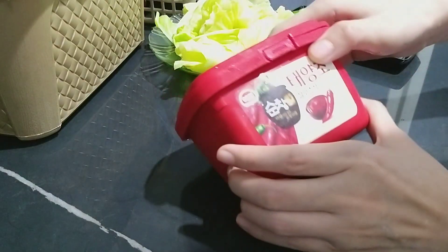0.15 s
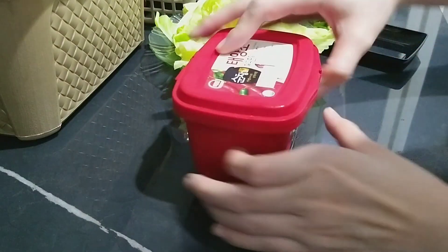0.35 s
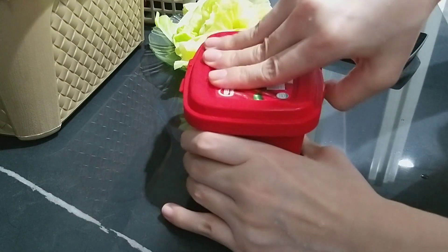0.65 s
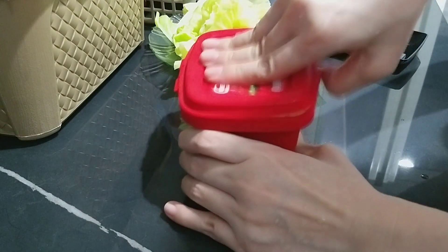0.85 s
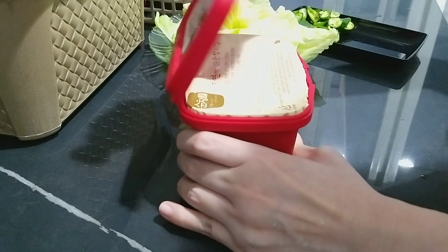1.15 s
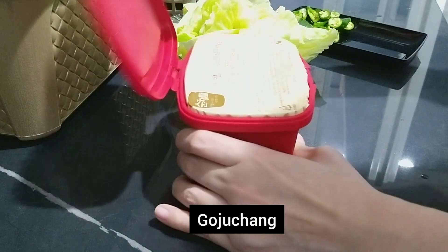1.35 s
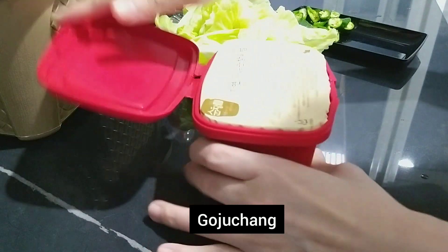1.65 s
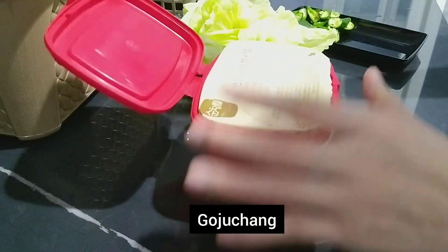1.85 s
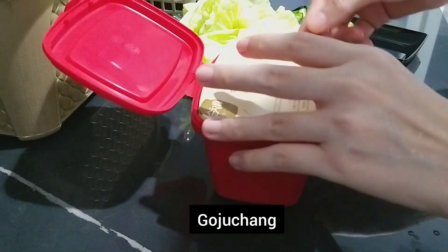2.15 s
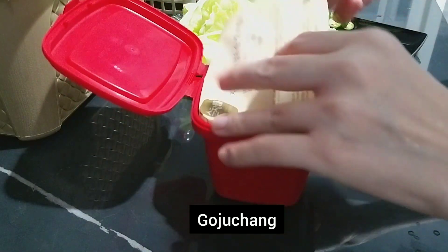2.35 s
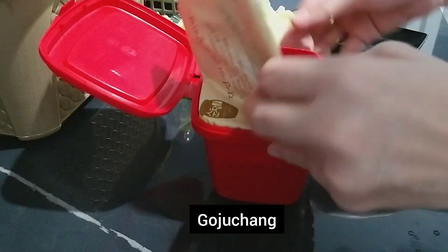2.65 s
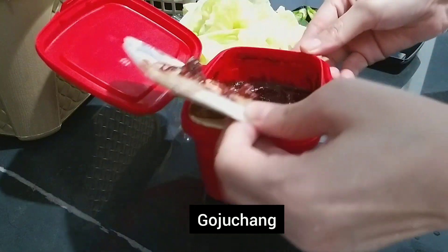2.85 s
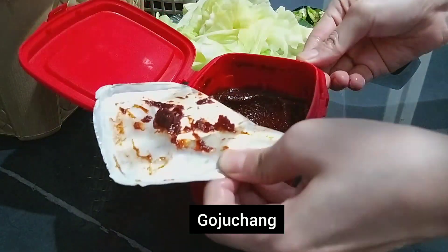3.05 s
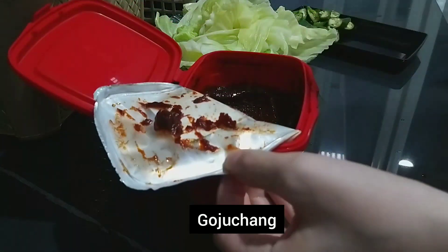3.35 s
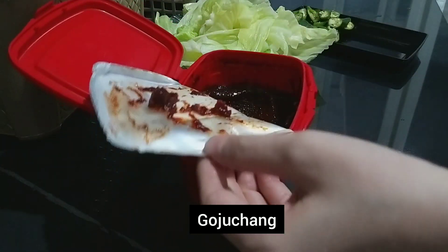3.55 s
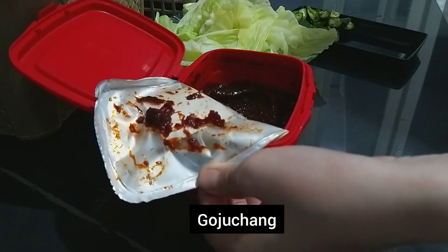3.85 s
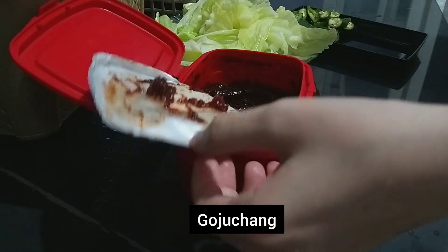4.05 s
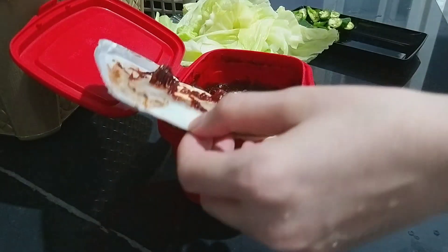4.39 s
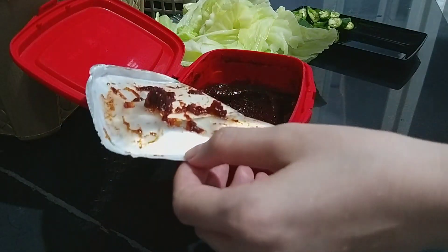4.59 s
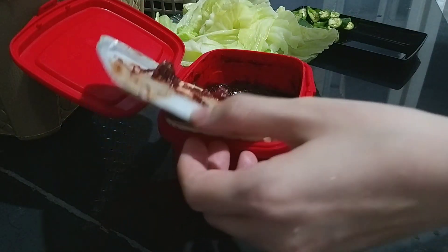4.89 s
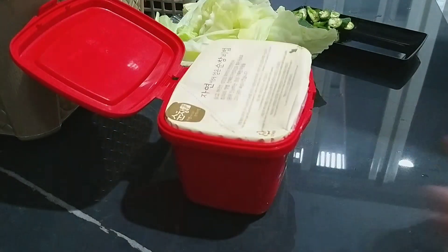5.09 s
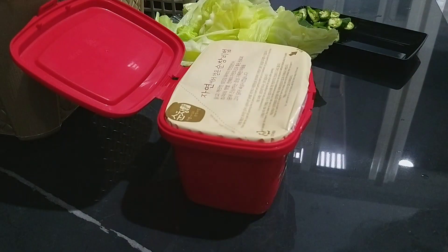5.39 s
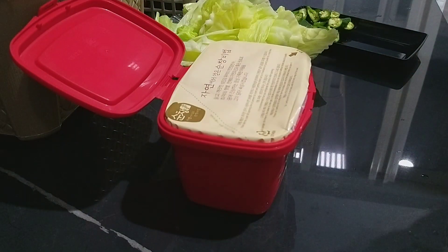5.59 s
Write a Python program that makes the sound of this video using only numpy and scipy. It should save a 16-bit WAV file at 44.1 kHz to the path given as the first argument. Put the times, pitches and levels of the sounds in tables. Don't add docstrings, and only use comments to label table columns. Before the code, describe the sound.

Close stereo in a hard, echoing kitchen with low building hum. A full plastic tub knocks onto stone, its lid clips crack open loudly and the lid flaps back. Nails tick at a film seal, which crinkles and tears in jumps. Then something drags at the right, crashes, and dishes rattle, skid and tumble until the end.

```python
import sys
import numpy as np
from scipy import signal
from scipy.fft import rfft, irfft, next_fast_len
from scipy.io import wavfile
from scipy.ndimage import map_coordinates

SR = 44100
rng = np.random.default_rng(int(sys.argv[2]) if len(sys.argv) > 2 else 0)


def transcribe(signal):
    frames = np.atleast_2d(signal).T
    limited = np.clip(frames, -1, 1)
    pcm = np.round(limited * 32767).astype(np.int16)
    wavfile.write(sys.argv[1], SR, pcm)


def elevation(decibels):
    levels = np.asarray(decibels, float)
    return 10 ** (levels / 20)


N = 252584
LIFE = 4096
ROOMS = 4
FILM_PAN_DB, FAR_PAN_DB = 2.8, -2.5

# (frequency [Hz], level [dB], t60 [s])
FAR_BODY = [(165, -12.5, 0.05), (234, -2.5, 0.097), (260.4, 4, 0.053), (462, 2, 0.1), (533, 13.5, 0.052),
            (568, 4.5, 0.044), (777, -1.5, 0.068), (1140, -7, 0.053), (1270, -3, 0.05)]
# (frequency [Hz], sharpness Q [1], level [dB])
FLAT_RING = [(1000, 14, -2.5), (1290, 36, -2), (1586, 58, 2), (1770, 56, 12), (1850, 63, 12.5),
             (2376, 56, 9.5), (2750, 53, 1), (3270, 21, 6), (3680, 40, -1), (3880, 37, 2), (4170, 53, 3.5),
             (4960, 56, -5), (5830, 89, -4), (6750, 74, 2)]
# (frequency [Hz], sharpness Q [1], level [dB])
RIM_RING = [(760, 30, 2), (1140, 29, 2.4), (1276, 13, 3.4), (1727, 73, 7), (2540, 30, 6.8),
            (3070, 150, 2.7), (3743, 55, 8.9), (4060, 67, 3.6), (4470, 46, 3), (4930, 80.4, 7.7),
            (5790, 100, 3.5)]


def unit(x):
    return x / np.sqrt(np.mean(x ** 2) + 1e-20)


def along(points, hz, axis=1):
    p = np.transpose(points)
    return np.interp(np.log(hz + 1), np.log(p[0] + 1), p[axis])


def wobble(rate):
    knots = rng.standard_normal(int(N * rate / SR) + 4)
    return map_coordinates(knots, [np.arange(N) * rate / SR])


def filtered(x, response):
    n = x.shape[-1]
    m = next_fast_len(n + LIFE)
    return irfft(rfft(x, m) * response(np.fft.rfftfreq(m, 1 / SR)), m)[..., :n]


def diffuse(pair, gain):
    # (frequency [Hz], correlation [1])
    likeness = [(60, 0.92), (130, 0.87), (290, 0.75), (640, 0.34), (1410, -0.22), (3100, 0.037),
                (6820, 0.02), (15000, -0.12)]
    turn = lambda hz: np.arccos(np.clip(along(likeness, hz), -1, 1)) / 2
    mid, side = filtered(pair, lambda hz: gain(hz) * np.array([np.cos(turn(hz)), np.sin(turn(hz))]))
    return np.array([mid + side, mid - side])


def resonance(hz, centre_hz, q):
    width = 1j * hz * centre_hz / q
    return width / (centre_hz ** 2 - hz ** 2 + width)


def ringing(modes, flat):
    return lambda hz: flat + sum(elevation(db) * resonance(hz, centre_hz, q) for centre_hz, q, db in modes)


def strokes(rows, rise_db_s, fall_db_s):
    s, hold, *cols = np.transpose(rows)[..., None]
    t = np.arange(N) / SR
    before, after = np.maximum(s - t, 0), np.maximum(t - s - hold, 0)
    shape = elevation(-rise_db_s * before - fall_db_s * after)
    return [(elevation(db) * shape).sum(0) for db in cols]


def contact(row, ring_ms, grows, body, soft_ms, rise_ms, spike, q, alike, trims_db, detune=0.067):
    _, db, knock_db, crack_db, snap_hz = row
    t60_ms = ring_ms * elevation(grows * (db + 33.0))
    t = np.arange(LIFE) / SR
    ms = t * 1000

    shared, own = rng.standard_normal((2, LIFE)), rng.standard_normal((2, 2, LIFE))
    noise = np.sqrt(np.clip(alike, 0, 1)) * shared[:, None] + np.sqrt(np.clip(1 - alike, 0, 1)) * own
    noise = noise * np.repeat(elevation(rng.normal(0, 4, LIFE // 32)), 32)

    def burst(pair, decay_ms):
        fade = elevation(-60 * ms / max(decay_ms, 1)) * (1 - np.exp(-ms / rise_ms))
        fade = fade * (1 + spike * np.exp(-t / 0.0004))
        return np.vstack([pair * fade, np.linalg.norm(fade) * (t == 0)])

    def snap_tone(hz):
        skirt = resonance(hz, snap_hz, .3) / (1 + 1j * hz / (2.5 * snap_hz + 1500)) ** 2
        return resonance(hz, snap_hz, q) * skirt / (1 + 0.18 * snap_hz / (1j * hz + 1))

    snap = filtered(burst(noise[0], t60_ms), snap_tone)
    crack = filtered(burst(noise[1], 0.8 * t60_ms), lambda hz: resonance(hz, 7800, 0.85) ** 2)
    knock = np.zeros(LIFE)
    for hz, level, t60 in body:
        decay = elevation(level + rng.normal(0, 5.2) - 60 * t / t60)
        knock += decay * np.sin(2 * np.pi * hz * rng.normal(1, detune) * t)
    knock = np.tile(knock * (1 - np.exp(-ms / soft_ms)), (3, 1))

    parts = zip((snap, knock, crack), (0, knock_db, crack_db), trims_db)
    return sum(elevation(db + rel + trim) * p / np.abs(p[:2]).max() for p, rel, trim in parts)


def contacts(table, order, pan_db, ring=None, **how):
    out = np.zeros((ROOMS, 3, N + LIFE + 64))
    pan = elevation(np.array([[pan_db], [-pan_db], [0]]) / 2)
    lags = max(order, 0), max(-order, 0), 0
    for k, row in enumerate(table):
        sound = contact(row, **how) * pan
        sound = filtered(sound, ring) if ring else sound
        for c, lag in enumerate(lags):
            out[k % ROOMS, c, round(row[0] * SR) + lag:][:LIFE] += sound[c]
    return out[..., :N]


def kitchen(x):
    # (frequency [Hz], t60 [s], level [dB])
    decay = [(99, 0.62, -3.5), (295, 0.49, -6), (1000, 0.45, 0), (3000, 0.47, -1.5), (7300, 0.42, 3.5),
             (14000, 0.32, 0.5)]
    hz, t, z = signal.stft(rng.standard_normal((2, SR * 3 // 4)), SR, nperseg=256)
    tail = signal.istft(z * elevation(-60 * t / along(decay, hz)[:, None]), SR, nperseg=256)[1]
    n = tail.shape[1]
    tail = tail * np.clip(np.arange(n) / SR / 0.0021 - .3, 0, 1)
    tail = tail * elevation(2.5 * wobble(120)[:n])
    tail = diffuse(tail / np.linalg.norm(tail[0]), lambda f: elevation(along(decay, f, axis=2)))
    return signal.fftconvolve(x[None], tail, axes=1)[:, :N]


def room_tone():
    # (frequency [Hz], density [dB per Hz])
    spectrum = [(12, -51.5), (20, -28), (48, -15.5), (65, -6.5), (86, -7), (258, -20.5), (492, -31),
                (1050, -45.5), (1140, -41.5), (2180, -47), (2890, -47.5), (7510, -46.5), (15200, -44),
                (16500, -51.5)]
    hum = elevation(1.8 * wobble(8.2)) * rng.standard_normal((2, N))
    hiss = elevation(1.0) * rng.standard_normal((2, N))
    low = lambda hz: 1 / (1 + (hz / 450) ** 4)
    air = filtered(hum, low) + filtered(hiss, lambda hz: 1 - low(hz))
    return elevation(-67.5) * unit(diffuse(air, lambda hz: elevation(along(spectrum, hz))))


def rubbing():
    # (time [s], hold [s], rumble [dB], scrape [dB])
    hand = [(.03, 0.011, -60.5, -91), (.278, 0.017, -66.5, -77), (1.375, 0.044, -77, -80.5),
            (1.61, 0.033, -66, -100), (2.23, 0.013, -66, -63), (2.33, 0.07, -89, -66),
            (2.43, 0.24, -65.5, -70), (2.85, 0.065, -62, -90), (2.96, 0.078, -66, -74),
            (3.11, 0.14, -63, -74), (3.33, 0.096, -74.5, -67.5), (3.5, 0.075, -62.5, -67),
            (3.61, 0.24, -83, -78), (5.15, 0.097, -54.5, -56.5), (5.31, 0.27, -52.5, -52),
            (5.58, 0.18, -50.5, -60)]
    # (time [s], weight [dB], slide [dB])
    drag = [(3.949, -100, -99), (4.02, -62, -69), (4.078, -54, -71), (4.14, -43.5, -61),
            (4.506, -45.5, -61), (4.552, -49, -60), (4.572, -45.5, -51), (4.64, -47.5, -46.5),
            (4.669, -42.5, -38), (4.82, -53.5, -56.5), (4.9, -110, -110)]
    # (time [s], hold [s], level [dB])
    thuds = [
        (.886, 0.01, -39),
        (1.408, 0.053, -60.5),
        (3.6, 0.28, -62),
        (3.83, 0.0081, -59),
        (3.88, 0.053, -69),
        (4, 0.051, -51),
        (4.085, 0.014, -43),
        (5.355, 0.051, -54.5),
        (5.51, 0.06, -42.5),
        (5.65, 0.087, -67),
    ]
    # (frequency [Hz], density [dB per Hz])
    rumble_hz_db = [(76, -13.5), (130, 0), (251, -0.5), (288, -3.5), (330, 0.5), (522, -8.5), (617, -7),
                    (776, -11), (1120, -12.5), (1300, -16), (1590, -17.5), (5000, -40.5), (6500, -54.5),
                    (11000, -120)]
    scrape_hz_db = [(470, -37), (800, -4.5), (978, -11), (1440, -17.5), (1950, -13), (3650, -19.5),
                    (4990, -20), (12500, -28), (16000, -38)]
    # (frequency [Hz], sharpness Q [1], level [dB])
    base_hum = [(216, 11, 0), (334, 14, -3.6), (550, 12, -7), (860, 24, -0.5), (1095, 15, 1)]
    slide_ring = [(1022, 17, 7), (1740, 28, 5), (1990, 44, 8), (2343, 35, 8), (2835, 47, 10), (3310, 50, 4),
                  (3500, 37, 7), (3870, 70, 3), (4220, 70, 3), (5400, 110, -2), (7200, 40, 5)]

    s, *drag_db = np.transpose(drag)
    weight, slide = [elevation(np.interp(np.arange(N) / SR, s, db, left=-150)) for db in drag_db]
    rumble_gain, scrape_gain = np.add(strokes(hand, rise_db_s=487, fall_db_s=345), [weight, slide])
    lumps = elevation(.5 * wobble(30) + 1.2 * wobble(150)) * rng.standard_normal((2, N))
    slips = elevation(1.2 * wobble(60) + 3 * wobble(900)) * rng.standard_normal((2, N))
    base, surface = ringing(base_hum, flat=1.1), ringing(slide_ring, flat=1.3)
    rumble = unit(diffuse(lumps, lambda hz: elevation(along(rumble_hz_db, hz)) * base(hz)))
    scrape = unit(diffuse(slips, lambda hz: elevation(along(scrape_hz_db, hz)) * surface(hz)))

    worktop = lambda hz: resonance(hz, 127, 1.2) ** 2 * np.minimum(hz / 70, 1)
    shudder = unit(diffuse(rng.standard_normal((2, N)), worktop))
    bumps = strokes(thuds, rise_db_s=500, fall_db_s=299.5)[0] + elevation(-14.5) * weight
    return rumble_gain * rumble + scrape_gain * scrape + bumps * shudder


def creaking():
    # (time [s], hold [s], level [dB], pitch [Hz])
    creaks = [
        (0.035, .05, -72.5, 550),
        (0.055, 0.05, -82, 1130),
        (3.491, 0.067, -55.5, 416),
        (3.614, 0.029, -64, 424),
        (4.567, 0.215, -53, 230),
    ]
    pitches_hz = np.array([row[3] for row in creaks])[:, None]
    hums = filtered(rng.standard_normal(N), lambda hz: resonance(hz, pitches_hz, 4.3) ** 2)
    gains = [strokes([row[:3]], rise_db_s=1500, fall_db_s=899.5)[0] for row in creaks]
    return sum(gain * unit(hum) for gain, hum in zip(gains, hums))


def tub_and_clips():
    # (time [s], snap [dB], knock re snap [dB], crack re snap [dB], snap pitch [Hz])
    hits = [(0.2973, -29.5, 16.5, -6.5, 1690), (0.3037, -29, 5, -15.5, 1850), (0.3154, -26, 9, -24.5, 1064),
            (.8535, -46.5, 2, -7.5, 1465), (0.8582, -26, -8.5, -7, 3084), (0.8652, -12.5, 0, -5.5, 3060),
            (.872, -24.5, -2, -3, 2863), (0.8798, -15.5, -11, -1, 3180), (0.8842, -20.5, 6.5, -6, 754),
            (0.8875, -17, 0.5, -7, 894), (1.0948, -49.5, 8, -29.5, 1005)]
    # (frequency [Hz], level [dB], t60 [s])
    closed_body = [(167, -5, 0.068), (246, 5.5, 0.017), (328, -0.5, 0.05), (404, 1, 0.056),
                   (494, -1.5, 0.055), (704, -4, 0.028)]
    open_body = [(121, -23.5, 0.21), (174, -4.5, 0.039), (234, -3, 0.007), (356, 4.5, 0.038),
                 (410, 2.5, 0.033), (487, -11.5, 0.18), (785, -6.5, 0.051)]
    down = contacts(hits[:3], order=-2, pan_db=1.0, body=closed_body, detune=.025, ring_ms=54, grows=0.015,
                    soft_ms=0.96, rise_ms=0.17, spike=1.4, q=0.8, alike=0.15, trims_db=(.1, .1, .1))
    clips = contacts(hits[3:], order=-2, pan_db=1.5, body=open_body[2:], ring_ms=33, grows=-.05,
                     soft_ms=0.46, rise_ms=0.66, spike=0.48, q=1.0, alike=0.14, trims_db=(.1, .1, .1))
    return down + clips


def lid_flop():
    # (time [s], snap [dB], knock re snap [dB], crack re snap [dB], snap pitch [Hz])
    flops = [
        (1.4087, -49.5, 2.1, -7, 930),
        (1.4277, -45.5, 1.1, 1, 1000),
        (1.4517, -57.5, 7.7, -11.5, 962),
        (1.6487, -43, 11, -26, 1560),
        (1.6722, -35.5, 10.1, -15, 1210),
        (1.7207, -35, 10.1, -13.5, 1430),
    ]
    # (frequency [Hz], level [dB], t60 [s])
    hinge_body = [(123, 7.5, 0.065), (160, 5.5, 0.076), (218, 3, 0.041), (274, 0.5, 0.077),
                  (368, 2.5, 0.048), (581, -11.5, 0.068), (950, -9.5, 0.029)]
    lid_body = [(158.5, -9, 0.038), (219.6, -12, 0.038), (230, 11.5, 0.042), (364, 12, 0.036),
                (418.5, 3, 0.049), (446, -3.5, 0.063), (560, -7.5, 0.087)]
    swing = contacts(flops[:3], order=-5, pan_db=2.5, body=hinge_body, ring_ms=100, grows=0.01,
                     soft_ms=4.3, rise_ms=0.72, spike=1.45, q=0.07, alike=0.051, trims_db=(-3, 4, -3))
    landing = contacts(flops[3:], order=-5, pan_db=2.5, body=lid_body, detune=0.034, ring_ms=113, grows=0.0089,
                       soft_ms=2.5, rise_ms=0.28, spike=2.3, q=0.36, alike=0.11, trims_db=(-3, .1, -3))
    return swing + landing


def crinkling():
    # (time [s], hold [s], level [dB])
    folds = [
        (2.175, 0.15, -66),
        (2.33, 0.085, -52),
        (2.46, 0.39, -71),
        (2.86, 0.055, -52.5),
        (3.44, 0.079, -58),
        (3.645, 0.026, -50.5),
    ]
    sizes = elevation(3 * np.minimum(rng.exponential(1, (5, N)), 3.5))
    ticks = (rng.random((5, N)) < 45 / SR) * sizes * rng.choice([-1, 1], (5, N))
    pitches_hz = np.array([[500], [640], [780], [950], [1300]])
    x = filtered(ticks, lambda hz: resonance(hz, pitches_hz, 5.6) * resonance(hz, pitches_hz, 2.1))
    return elevation(-8.5) * strokes(folds, rise_db_s=269, fall_db_s=254)[0] * unit(x.sum(0))


def film_peel():
    # (time [s], snap [dB], knock re snap [dB], crack re snap [dB], snap pitch [Hz])
    picks = [(2.188, -45.5, 2, -18.5, 2100), (2.2244, -42, -10, -38, 910), (2.2345, -28, -3.5, -27, 2420),
             (2.265, -54, -2, -21, 1000), (2.271, -42, 8.5, -21, 1490), (2.2895, -24, -9, -29, 4000),
             (2.3044, -49, -22, -9, 4170), (2.3106, -32.5, -16, -2.5, 3390), (2.3264, -32, -16, -3, 2820),
             (2.3366, -30, -37, -29, 1280), (2.4214, -49, -11, 11, 960), (2.4937, -51.5, 8, -9, 970),
             (2.5077, -30.5, -12.5, -19, 1320), (2.5391, -52, 4, -25, 969), (2.5684, -57.5, -10, 9, 1130),
             (2.603, -50.5, 19, -23, 970), (2.6214, -39.5, -6, -15, 1560), (2.724, -51, -26, 7, 2000),
             (2.7521, -45.5, -16, -27, 1010), (2.768, -53, 0, -25, 1500)]
    tears = [(2.811, -24.5, -23, -15, 2540), (2.813, -30, -5, 0, 1470), (2.817, -21.5, -9.5, -1.5, 2720),
             (2.8302, -19, -18, -1, 3830), (2.879, -30.5, -32, -31, 2900), (2.8924, -53.5, 17.5, -15, 939),
             (2.9944, -28, -27, -25, 1430), (3.0133, -39, -16, -2, 2070), (3.021, -32, -16.5, 6, 3700),
             (3.086, -33.5, -29, -27, 1460), (3.111, -18.5, -30, -9, 3770), (3.119, -23, -34, -15, 2130),
             (3.3152, -21.5, -33, -42, 4750), (3.344, -38, -37, -30, 1170), (3.419, -20.5, -23, 1.1, 2740),
             (3.449, -41.5, -21, -30, 1140), (3.4868, -40, -3, -23, 1070), (3.5543, -35.5, -24, -30, 1140),
             (3.603, -43, -12, -13, 950), (3.6292, -24.5, -31.5, -20, 1990),
             (3.6476, -28.5, -15.5, -16.5, 1316), (3.7432, -39, -35, -43, 1300),
             (3.785, -18, -40, -43, 3300), (4.045, -48, -22, -14, 4600)]
    # (frequency [Hz], level [dB], t60 [s])
    film_body = [(215, -11.5, 0.029), (422, -8.5, 0.033), (508, -6.5, 0.03), (652, -7, 0.036),
                 (758, -1, 0.016)]
    return contacts([*picks, *tears], order=-6, pan_db=FILM_PAN_DB, body=film_body, ring_ms=34.3, grows=0.09,
                    soft_ms=0.93, rise_ms=.15, spike=3.4, q=0.79, alike=0.077, trims_db=(.1, -3, .1))


def fizzing():
    # (time [s], hold [s], level [dB])
    threads = [(2.19, 0.028, -77), (2.25, 0.026, -79), (2.3, .07, -73), (2.44, 0.079, -81),
               (2.63, 0.12, -75), (2.84, 0.057, -69), (3.03, 0.041, -72), (3.13, 0.072, -63),
               (3.33, 0.018, -54), (3.43, 0.066, -61), (3.65, 0.12, -76), (3.8, 0.13, -70)]
    sizes = elevation(5 * np.minimum(rng.exponential(1, (3, 2, N)), 3.5))
    ticks = (rng.random((3, 2, N)) < 220 / SR) * sizes
    pitches_hz = np.array([2400, 3200, 4700])[:, None, None]
    x = filtered(ticks, lambda hz: resonance(hz, pitches_hz, 5.4) * resonance(hz, pitches_hz, 0.77))
    pan = elevation(np.array([[FILM_PAN_DB], [-FILM_PAN_DB]]) / 2)
    return strokes(threads, rise_db_s=900, fall_db_s=223)[0] * unit(x.sum(0)) * pan


def first_crash():
    # (time [s], snap [dB], knock re snap [dB], crack re snap [dB], snap pitch [Hz])
    hits = [(4.819, -34, 4.5, -4, 2000), (4.825, -25.5, 2, -12, 2500), (4.8318, -11, -25, -3.5, 1030),
            (4.8359, -12, -11.5, -2.5, 2950), (4.844, -8, -12, -4.5, 2330), (4.8512, -10.5, -7, -9.5, 1000),
            (4.8584, -16.5, -7.5, -3, 3030), (4.8702, -25, -3, -19.5, 1800), (4.8815, -17, -7, -15, 1810),
            (4.9529, -36, -31, -24, 1980), (5.2004, -38, -3.5, -1.5, 902)]
    # (frequency [Hz], level [dB], t60 [s])
    crash_body = [(254, -1, 0.06), (291, 8.5, 0.067), (324.6, 5.5, 0.07), (382.6, 1, 0.16),
                  (486.5, 10.5, 0.059), (592, 6.5, 0.091), (703, 2.5, 0.08), (860, 1, 0.074),
                  (1000, 4, 0.054)]
    return contacts(hits, order=13, pan_db=FAR_PAN_DB, ring=ringing(FLAT_RING, flat=1.03), body=crash_body,
                    detune=0.023, ring_ms=33, grows=.01, soft_ms=2.4, rise_ms=1.33, spike=3.7, q=0.07,
                    alike=0.34, trims_db=(-2.5, -1.5, -3.5))


def settling():
    # (time [s], snap [dB], knock re snap [dB], crack re snap [dB], snap pitch [Hz])
    ticks = [(4.8635, -21, -8.5, -8, 2460), (4.8855, -31, 1, -10, 1770), (4.909, -43.5, -15, -9.5, 1800),
             (4.935, -40, 5, -14, 1850), (5.345, -37, -8, -7.5, 3650), (5.497, -34.5, -6.5, 8, 1300),
             (5.513, -38, 4, -8, 2500), (5.528, -26.5, -4, -12, 1740), (5.537, -27, -11, -10, 2460),
             (5.571, -27.5, -13, -17, 1310), (5.59, -36.5, -5, -12, 2610), (5.612, -30, -21, -15, 1200),
             (5.632, -33.5, -6, -12, 2600)]
    x = contacts(ticks, order=13, pan_db=FAR_PAN_DB, body=FAR_BODY, ring_ms=10.5, grows=.01, soft_ms=1.0,
                 rise_ms=0.43, spike=2.1, q=1.9, alike=0.48, trims_db=(.1, .1, .1))
    x = filtered(x.sum(0), ringing([*RIM_RING, *FLAT_RING[3:6]], flat=1.12))
    return x[:2] + elevation(-0.5) * kitchen(x[2])


def rattling():
    # (time [s], level [dB])
    beats = [
        (5.025, -33),
        (5.0347, -28),
        (5.049, -30),
        (5.062, -45),
        (5.0668, -26),
    ]
    # (knock re snap [dB], crack re snap [dB], pitch [Hz])
    colour = (-34, -6.5, 950)
    return contacts([(*beat, *colour) for beat in beats], order=13, pan_db=FAR_PAN_DB, body=FAR_BODY, ring_ms=25,
                    grows=.01, soft_ms=0.84, rise_ms=0.58, spike=1.8, q=1.7, alike=0.32, trims_db=(2.5, .1, .1))


def squealing():
    # (time [s], hold [s], level [dB])
    skids = [
        (5.225, .03, -66),
        (5.27, .035, -52.5),
    ]
    # (frequency [Hz], sharpness Q [1], level [dB])
    rim = [(1860, 25, -6.5), (2580, 25, -1), (4000, 50, 3.5), (5790, 76, -3), (6970, 50, -6),
           (8100, 150, -3), (10000, 120, -2), (12800, 100, -6)]
    rough = elevation(2.1 * wobble(80)) * rng.standard_normal((2, N))
    return strokes(skids, rise_db_s=495, fall_db_s=402)[0] * unit(filtered(rough, ringing(rim, flat=0.26)))


def tumbling():
    # (time [s], snap [dB], knock re snap [dB], crack re snap [dB], snap pitch [Hz])
    hits = [(5.315, -26.5, -28, -8, 3000), (5.3192, -24.5, 0.5, 2.5, 3480), (5.327, -22.5, -3, -10.5, 1050),
            (5.3508, -39, -2, -19, 875), (5.4245, -37, -6, 3.5, 3500), (5.4333, -23, -5, -19, 1230),
            (5.4493, -26, -14, -13, 1260), (5.4715, -20.5, -5, -3, 1300), (5.4785, -17.5, -3, -10, 1170),
            (5.4871, -17.5, -4.5, -13, 1230), (5.5064, -20.5, -1.5, -17, 1930),
            (5.5209, -21.5, -3, -4, 1130), (5.5458, -29.5, -24, -10, 3680), (5.5572, -37, 6, -19, 2550),
            (5.702, -35.5, -10, -6, 4000), (5.708, -18, -19.5, -18, 2700), (5.7139, -16.5, -7, -3, 925),
            (5.7204, -14, -4, -7.5, 1140)]
    # (frequency [Hz], sharpness Q [1], level [dB])
    dish_ring = [(950, 9.2, 4.1), (1836, 40, 7.4), (3430, 34, 5.7), (3585, 58, 9.9), (4000, 98, 2.6),
                 (5660, 64, 7.7), (7280, 62, 9.2), (10300, 190, 5.2), (12400, 58, 7.1), (14300, 100, 8)]
    # (frequency [Hz], level [dB], t60 [s])
    dish_body = [(117, -20, 0.051), (250, -10, 0.12), (279, -5.5, 0.061), (300, -4, 0.083),
                 (440, -4.5, 0.081), (598, 0.5, 0.049), (660, -5, 0.049)]
    dish = contacts(hits[:4], order=13, pan_db=FAR_PAN_DB, ring=ringing(dish_ring, flat=0.82), body=dish_body,
                    detune=.015, ring_ms=58, grows=.01, soft_ms=1.3, rise_ms=0.89, spike=3.7, q=0.32,
                    alike=0.3, trims_db=(-2.5, -1.5, -3.5))
    pan = contacts(hits[4:], order=13, pan_db=FAR_PAN_DB, ring=ringing(RIM_RING, flat=1.1), body=FAR_BODY,
                   detune=0.016, ring_ms=68, grows=.01, soft_ms=1.4, rise_ms=2.7, spike=2.0, q=0.1,
                   alike=0.24, trims_db=(-2.5, -1.5, -2.5))
    return dish + pan


def scene():
    tub, lid, film = tub_and_clips(), lid_flop(), film_peel()
    film[0] += crinkling() + creaking()
    clatter, rattle = first_crash() + tumbling(), rattling()

    hollow = lambda hz: 1.13 + elevation(-2) * resonance(hz, 900, 0.83)
    sends = elevation(-5) * filtered(tub[:, 2], hollow) + elevation(-5.5) * lid[:, 2] + elevation(-5.0) * film[:, 2]
    sends = sends + elevation(1.5) * clatter[:, 2] + elevation(-6.0) * rattle[:, 2]
    hits = (tub + lid + film + clatter + rattle)[:, :2].sum(0) + sum(kitchen(x) for x in sends)

    hits = filtered(hits, lambda hz: (1j * hz / 75 / (1 + 1j * hz / 75)) ** 2)
    return hits + rubbing() + room_tone() + settling() + fizzing() + squealing()


def top_cut(x):
    return signal.sosfilt(signal.butter(12, 16680, fs=SR, output="sos"), x)


def record(dry):
    top = lambda hz: elevation(-32 * np.clip((hz - 15600) / 600, 0, 1))
    return top_cut(filtered(dry, top))


dry = scene()
out = record(dry)
transcribe(out)
```